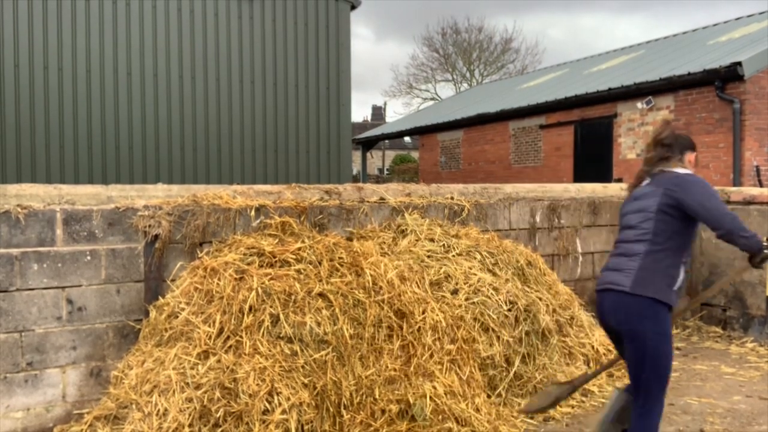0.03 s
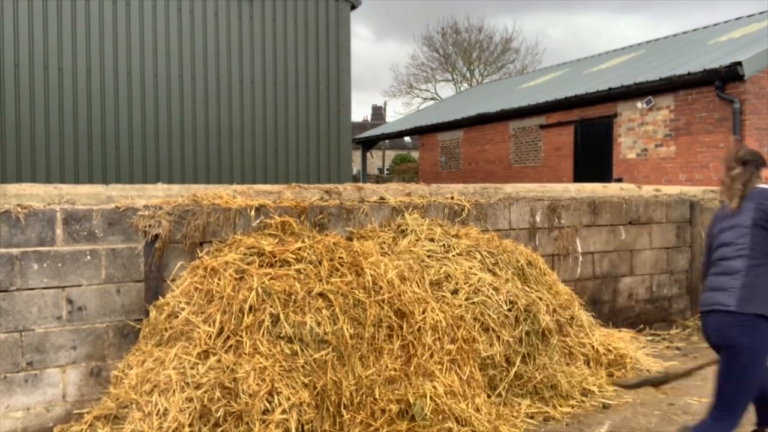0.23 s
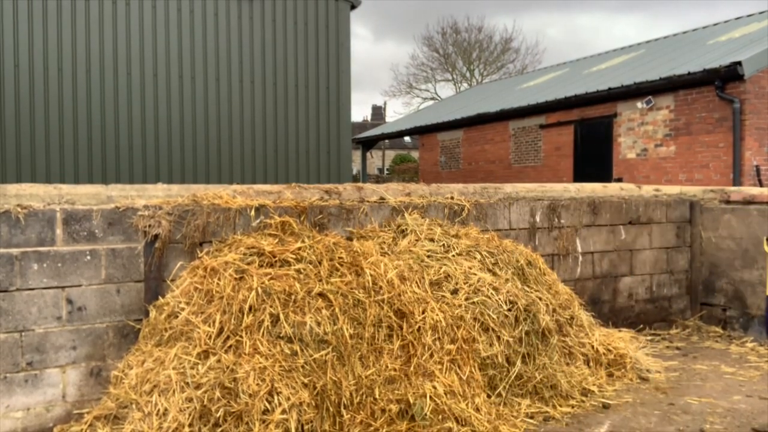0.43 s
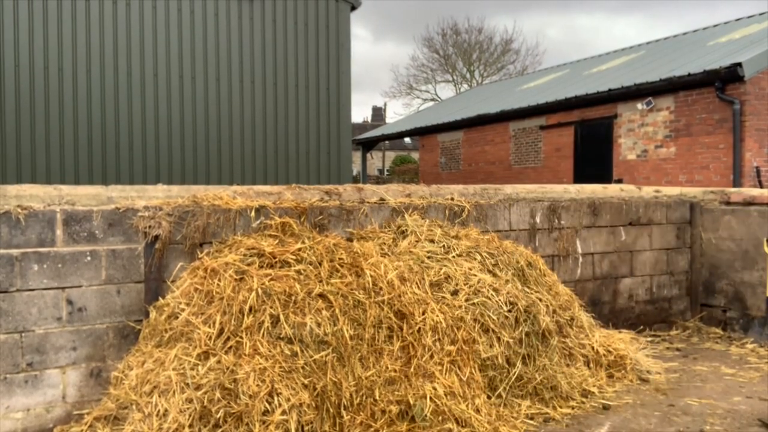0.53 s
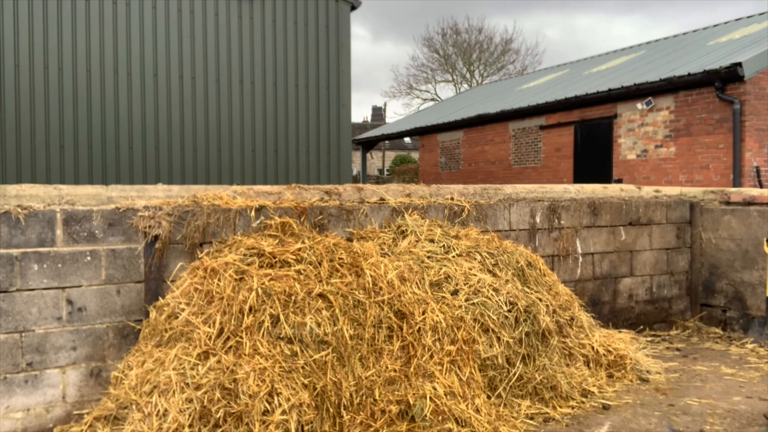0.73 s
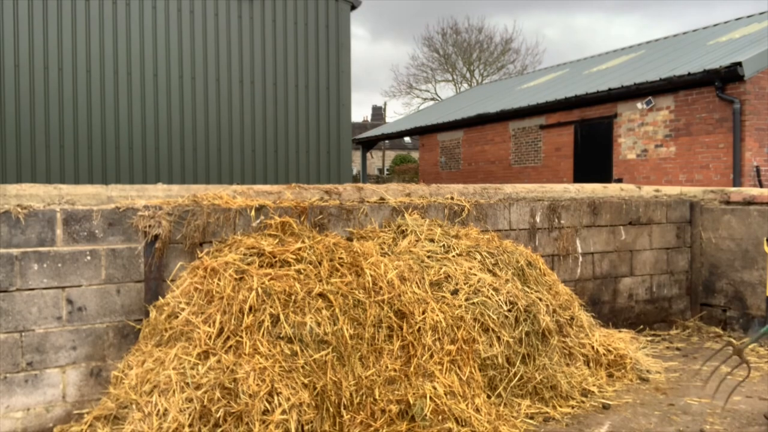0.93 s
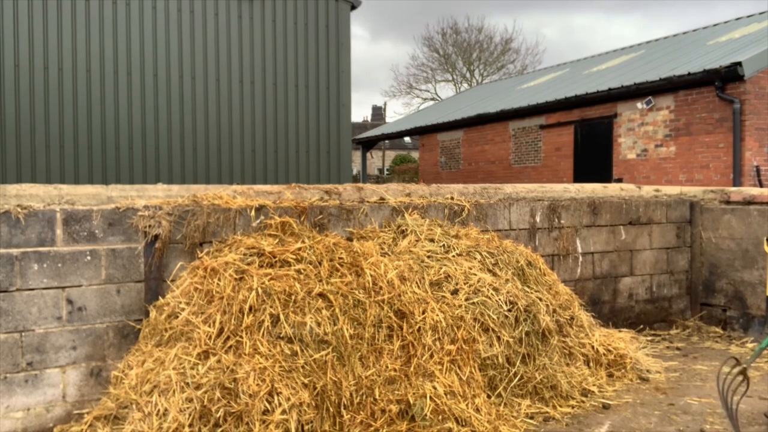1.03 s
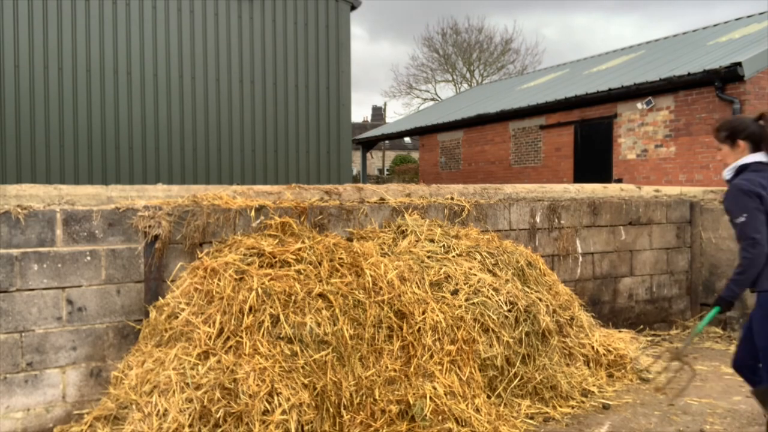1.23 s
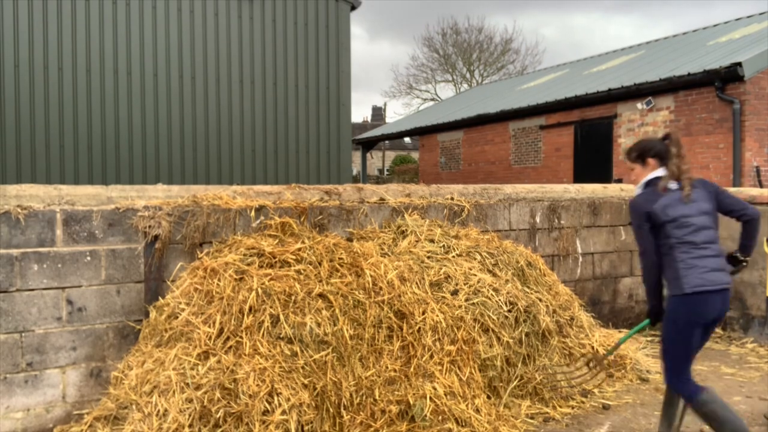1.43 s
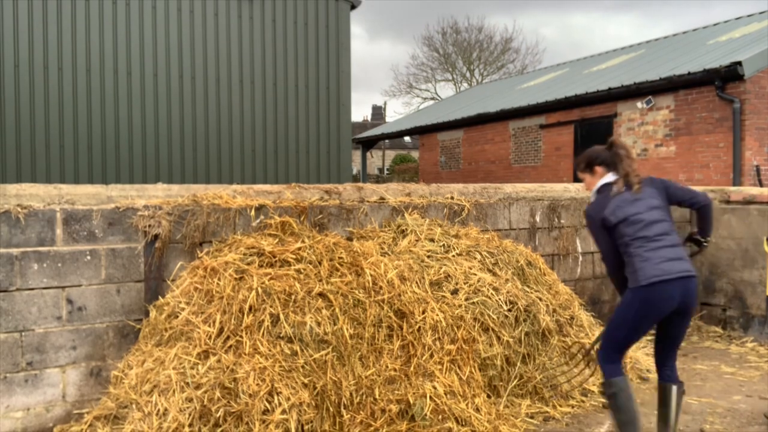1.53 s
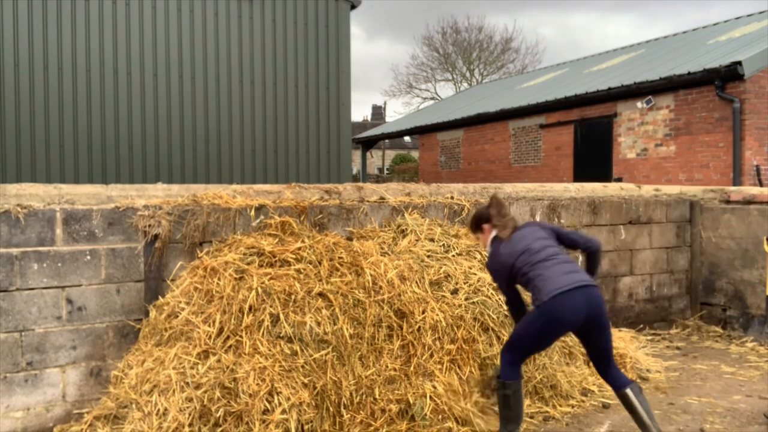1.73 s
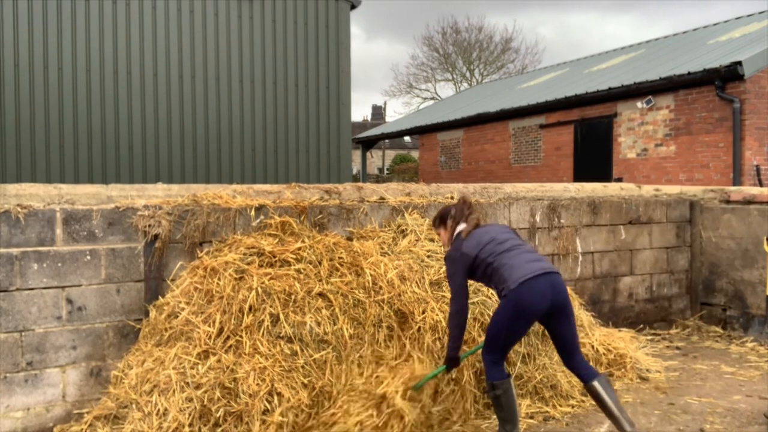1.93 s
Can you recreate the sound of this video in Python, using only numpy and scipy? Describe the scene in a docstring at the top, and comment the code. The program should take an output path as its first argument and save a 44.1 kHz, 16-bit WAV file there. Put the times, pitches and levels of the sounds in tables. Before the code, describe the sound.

A long-handled tool clatters and knocks on concrete, then a fork crunches into straw.

```python
"""A walled farmyard in a light wind. Boots scuff and loose straw rustles; off to the right the head of a
long-handled tool cracks and rings on concrete, then its shaft knocks twice. Gusts rumble and buffet the
microphone, hardest near the middle, while a small bird whistles far away. Last, a fork brushes the straw
and is driven into the heap, snapping and crushing stalks. The walls return a faint echo of the work."""
import sys
import numpy as np
from scipy import signal
from scipy.fft import rfft, irfft
from scipy.io import wavfile

SR = 44100
rng = np.random.default_rng(int(sys.argv[2]) if len(sys.argv) > 2 else 0)


def pcm_store(signal):
    """Save signal as 16-bit PCM."""
    levels = np.round(np.clip(np.atleast_2d(signal), -1, 1) * 32767)
    wavfile.write(sys.argv[1], SR, levels.astype(np.int16).T)


N = 88200
T = np.arange(N) / SR


def knocks(hits, modes, crack_spectrum, snap_gain, snap_treble_db):
    """Each contact rings the modes by where it lands and adds a crack: bright snap, gritty decay."""
    out = np.zeros((2, N))
    for start, ring_db, crack_db, cutoff_hz, point, t60_share in hits:
        age = np.maximum(T - start, 0)
        ring = np.zeros(N)
        for k, (hz, *levels_db, t60) in enumerate(modes):
            gain = (-1) ** k * from_db(np.interp(point, [0, 1], levels_db))
            ring += gain * decay(start, t60_share * t60) * np.sin(2 * np.pi * hz * age)
        ring *= 1 - np.exp(-age / 0.0005)  # soft onset
        grit = scattered(rng.standard_normal((3, N))) * unit_energy(decay(start, t60_s=0.066))
        snap = rng.standard_normal(N) * unit_energy(decay(start, t60_s=0.011))
        snap = from_right(colour(snap, [(3000, 0.0047), (13000, snap_treble_db)]))
        crack = colour((grit + snap_gain * snap) / np.hypot(1, snap_gain), crack_spectrum)
        out += low_pass(from_db(ring_db) * from_right(ring) + from_db(crack_db) * crack, cutoff_hz)
    return out


# head contacts: (time [s], ring gain [dB], crack gain [dB], cut-off [Hz], point [0 edge, 1 flat],
# share of free t60 [ratio])
HEAD_HITS = [(.3888, -18, -7, 16080, 0, 0.92), (.3905, -5.5, -1, 16000, 0, 0.41),
             (.3928, -2, -4.5, 2500, 0.19, 0.46), (.4015, -23, -11, 12040, 0, 0.52),
             (.4475, -25.5, -25.5, 2967, 1, 1), (.4632, -29, -17, 6360, 1, 0.82),
             (.4688, -10.5, -16.5, 1460, 0.68, 1), (.4975, -20, -19.5, 1520, 1, 0.47),
             (.5215, -24, -25.5, 1800, 0.96, 1), (.571, -28.5, -31.5, 1096, 0.69, 1)]
# head modes: (frequency [Hz], edge-struck level [dB], flat-struck level [dB], free t60 [s])
HEAD_MODES = [(297, -31.5, -16.5, 0.1), (407, -25.5, -19.5, .13), (583, -28, -27.5, 0.11),
              (770, -13.5, -22.5, .06), (940, -36.5, -24, 0.071), (1135, -14.5, -26, 0.14),
              (1333, -10, -24.5, .11), (1450, -24.5, -31.5, .09), (1733, -11, -35.5, 0.08),
              (2070, -30, -33, 0.094), (2970, -18, -43, .045), (3600, -29.5, -40.5, .07)]
# head crack spectrum: (frequency [Hz], gain [dB])
HEAD_CRACK = [(150, -2.5), (450, 13.5), (780, 22), (1400, 20), (2500, 13), (3450, 13.5), (4050, -5.5),
              (4800, 6), (6500, 2), (11000, -3.5), (15500, -2.5)]

def tool_head():
    """The head clatters on concrete, ringing more briefly when pressed down."""
    return knocks(HEAD_HITS, HEAD_MODES, HEAD_CRACK, snap_gain=0.29, snap_treble_db=5.5)


# shaft contacts: (time [s], ring gain [dB], crack gain [dB], cut-off [Hz], point [0 end, 1 side],
# share of free t60 [ratio])
SHAFT_HITS = [(.6392, -34.5, -21, 12000, 0, .6), (.6425, -3.5, 1.5, 19850, 0.13, 0.89),
              (.6485, -3, -8, 2530, 0, 1), (.6525, -14.5, -4, 10960, 0, 0.54),
              (.7612, -9, -7.5, 7810, 0.99, 1), (.7703, -11.5, -11.5, 8290, 1, 0.27)]
# shaft modes: (frequency [Hz], end-struck level [dB], side-struck level [dB], free t60 [s])
SHAFT_MODES = [(343, -36.5, -36.5, 0.12), (571, -19, -21.5, 0.097), (808, -27, -17.5, 0.098),
               (1164, -19.5, -45.5, 0.05), (1410, -21, -28.5, 0.13), (1520, -32.5, -14, 0.089),
               (1646, -22.5, -32.5, .041), (1900, -25.5, -25.5, .033), (2410, -21.5, -49.5, .09),
               (2729, -29.5, -41, .075), (2994, -39, -18, .04), (8040, -26.5, -20, .007),
               (12900, -26, -44.5, .012)]
# shaft crack spectrum: (frequency [Hz], gain [dB])
SHAFT_CRACK = [(150, -11), (500, 16.5), (1000, -5), (1400, 16.5), (2300, 12.5), (3600, 6.5), (4700, 9),
               (6500, -1), (7900, 11.5), (9500, -1.5), (12200, 5), (14200, 6), (15500, -0.5)]

def tool_shaft():
    """The shaft knocks on its end, then on its side, rebounding each time."""
    return knocks(SHAFT_HITS, SHAFT_MODES, SHAFT_CRACK, snap_gain=0.61, snap_treble_db=7)


# faint ticks, then tine stabs: (time [s], force [dB], hold [s], stalk pitch [Hz], crush re snaps [dB])
STABS = [(0.174, -59.5, 0.0023, 11600, -17), (0.24, -55.5, .003, 9200, -26), (0.291, -56, 0.0027, 7100, -7),
         (0.309, -59, 0.0052, 8100, -24), (1.533, -47, .004, 8200, -3.5), (1.538, -48, 0.0087, 11800, -4.5),
         (1.7196, -28.5, 0.0034, 3770, -13.5), (1.7321, -27, 0.0048, 12800, -13),
         (1.746, -45.5, 0.013, 3930, 3.5), (1.7615, -34, 0.0042, 10300, -2.5), (1.769, -42, 0.012, 1520, 0),
         (1.791, -28.5, .002, 7670, -8), (1.8015, -33, 0.003, 3380, -7)]
# breaking straw spectrum: (frequency [Hz], gain [dB])
SNAP_SPECTRUM = [(400, -27.5), (1300, -18), (2600, -8), (3350, 0.5), (4700, -3.5), (7000, 3), (10000, 4.5),
                 (15500, 0)]
# crushed straw spectrum: (frequency [Hz], gain [dB])
CRUSH_SPECTRUM = [(400, -19.5), (1100, -8.5), (1500, 1), (2000, -5.5), (2700, -6.5), (3400, -1),
                  (5000, -9.5), (15500, -26)]

def straw_crunch():
    """Each stab snaps dry stalks, rings one of them and crushes the packed straw beneath."""
    rise_s, t60_s = 0.0015, 0.062
    snaps = crackle(SNAP_SPECTRUM, per_s=8000, spread_db=2.5)
    snaps += from_db(-3) * crackle(SNAP_SPECTRUM, per_s=900, spread_db=3)  # single stalks
    snaps = unit_rms(snaps * from_db(3 * drift(220)))  # stalks give way in bunches
    crush = crackle(CRUSH_SPECTRUM, per_s=3000, spread_db=3)
    out = np.zeros((2, N))
    for start, force_db, hold_s, stalk_hz, crush_db in STABS:
        attack = np.clip((T - start) / rise_s, 0, 1)
        release = from_db(-60 * np.clip((T - start - hold_s) / t60_s, 0, 4))
        ring = unit_rms(signal.lfilter(*signal.iirpeak(stalk_hz, Q=7, fs=SR), snaps))
        crunch = (snaps + from_db(-7.5) * ring + from_db(crush_db) * crush) / 2
        out += from_db(force_db) * attack * release * crunch
    return out


# sliding envelope: (time [s], level [dB])
SLIDE_LEVEL = [(0, -81), (.05, -68.5), (.13, -83), (.22, -103.5), (.31, -89), (.38, -61), (.47, -56),
               (.55, -62.5), (.62, -77.5), (1.24, -82), (1.35, -59), (1.40, -62.5), (1.51, -76),
               (1.57, -69.5), (1.65, -83), (1.71, -63), (1.77, -44), (1.86, -51.5), (2, -58)]
# sliding stalk spectrum: (frequency [Hz], gain [dB])
SLIDE_SPECTRUM = [(500, -5.5), (1200, -7.5), (3000, -2.5), (5000, -3), (7500, 3.5), (11000, -2),
                  (15500, -0.5)]

def straw_slide():
    """Loose stalks hiss and tick as they slide."""
    hiss = crackle(SLIDE_SPECTRUM, per_s=12000, spread_db=4.5)
    ticks = crackle(SLIDE_SPECTRUM, per_s=230, spread_db=4.5)
    return from_db(curve(T, SLIDE_LEVEL)) * (hiss + from_db(-4) * ticks)


# boot scuffs: (time [s], level [dB], t60 [s])
SCUFFS = [(.005, -70, 0.99), (0.037, -59.5, 0.099), (0.29, -62, 0.057), (1.648, -57, 0.043),
          (1.679, -58.5, 0.048), (1.70, -58.5, 0.19)]
# rasp spectrum: (frequency [Hz], gain [dB])
SCUFF_SPECTRUM = [(500, -11.5), (1500, -3), (2900, 2.5), (5000, -13), (9000, -16.5), (15500, -24)]

def boots():
    """Boots rasp on dry litter."""
    envelope = sum(from_db(db) * decay(start, t60) for start, db, t60 in SCUFFS)
    return envelope * crackle(SCUFF_SPECTRUM, per_s=1800, spread_db=3)


# eddies: (time [s], strength [dB], pitch [Hz])
BUFFETS = [(0.114, -25, 138), (0.221, -23.5, 290), (0.251, -27, 270), (0.277, -23.5, 456),
           (.305, -22.5, 336), (0.323, -25, 313), (0.356, -26.5, 343), (0.58, -17.5, 158),
           (0.592, -25.5, 261), (0.72, -31, 215), (0.797, -26.5, 200), (0.829, -18, 113), (0.937, -19, 337),
           (0.9477, -8, 297), (0.965, -14.5, 175.7), (.982, -22.5, 279), (1.034, -24, 330.6),
           (1.049, -19, 183), (1.064, -27, 232), (1.104, -22, 250), (1.301, -34, 332),
           (1.316, -33.5, 260.5), (1.429, -33.5, 264), (1.477, -34, 239), (1.559, -34, 173),
           (1.572, -25, 172), (1.644, -44, 327), (1.842, -32, 168), (1.99, -26.5, 145)]

def buffets():
    """An eddy hits the microphone: a damped thump and a turbulent puff, brighter the harder it hits."""
    t60_cycles, puff_s, puff_hz = 5.34, 0.0019, 700
    octaves_per_db, reference_db = 0.11, -23.5
    out = np.zeros(N)
    for start, db, hz in BUFFETS:
        thump = decay(start, t60_cycles / hz) * np.sin(2 * np.pi * hz * (T - start))
        thump = low_pass(thump, 2.15 * hz, order=3)
        puff = rng.standard_normal(N) * np.exp(-np.abs(T - start) / puff_s)
        puff = low_pass(puff, puff_hz) * np.sqrt(SR / 2 / puff_hz)  # power made up
        reach_hz = 2.52 * hz * 2 ** (octaves_per_db * (db - reference_db))
        out += from_db(db) * (thump + from_db(-12) * low_pass(puff, reach_hz, order=5))
    return high_pass(out, hz=74, order=3)


# gust envelope: (time [s], level [dB])
GUSTS = [(0, -44.5), (.17, -43.5), (.27, -32), (.36, -36.5), (.45, -40.5), (.55, -41), (.6, -30),
         (.68, -41.5), (.76, -43.5), (.84, -37), (.89, -36.5), (.97, -34.5), (1.09, -36.5), (1.17, -43),
         (1.24, -49.5), (1.33, -43), (1.41, -46.5), (1.52, -47.5), (1.56, -44), (1.63, -47.5), (2, -44)]
# rumble spectrum: (frequency [Hz], gain [dB])
RUMBLE_SPECTRUM = [(20, -32.5), (40, -40), (65, -10.5), (100, 1), (140, 1), (210, -4.5), (330, -19),
                   (500, -28.5), (1000, -39.5), (2000, -90.5)]
# flutter spectrum: (frequency [Hz], gain [dB])
FLUTTER_SPECTRUM = [(100, -15), (220, 3.5), (350, 4.5), (550, -4), (850, -20), (1300, -35.5), (3000, -46)]

def wind():
    """Lumpy rumble at the microphone, alike on both sides; flutter grows faster than the gust."""
    flutter_growth, reference_db = 1.93, -32.5
    gust_db = curve(T, GUSTS)
    rumble = from_db(gust_db + 1.5 * drift(15)) * noise(RUMBLE_SPECTRUM)
    flutter_db = -47 + flutter_growth * (gust_db - reference_db) + 4.5 * drift(71)
    return rumble + from_db(flutter_db) * noise(FLUTTER_SPECTRUM)


# whistles: (time [s], length [s], start pitch [Hz], middle pitch [Hz], end pitch [Hz], level [dB])
WHISTLES = [(-.02, 0.12, 5900, 5530, 5500, -73), (0.92, 0.031, 6900, 6570, 5640, -66.5),
            (1.025, 0.07, 5690, 4970, 5120, -72.5), (1.245, .09, 6370, 5350, 4810, -77),
            (1.567, 0.087, 6200, 6860, 6600, -77)]

def bird():
    """Thin, warbling whistles, each curving through three pitches."""
    warble_hz, tremor_db = 80, 3
    out = np.zeros(N)
    for start, length_s, *pitches_hz, db in WHISTLES:
        progress = np.clip((T - start) / length_s, 0, 1)
        glide_hz = np.polyval(np.polyfit([0, .5, 1], pitches_hz, 2), progress)
        hz = glide_hz + warble_hz * drift(410)
        envelope = from_db(db + tremor_db * drift(80)) * np.sqrt(np.abs(np.sin(np.pi * progress)))
        out += envelope * np.sin(2 * np.pi * np.cumsum(hz) / SR)
    return out


# distant air spectrum: (frequency [Hz], gain [dB])
AIR_SPECTRUM = [(100, -18), (500, 3.5), (1000, -1), (2500, -9), (5000, -25), (7500, -20.5), (11000, -36.5),
                (15500, -33)]

def air():
    """A steady distant hush, independent on each side."""
    return from_db(-68) * noise(AIR_SPECTRUM, shape=(2, N))


# ground and near-wall reflections: (delay [s], gain [dB])
BOUNCES = [(.0024, -13.5), (.0052, -11.5), (.011, -18)]

def bounced(x):
    """First reflections add to the sound and comb it."""
    return x + sum(from_db(db) * np.pad(x, ((0, 0), (int(s * SR), 0)))[:, :N] for s, db in BOUNCES)


# echo spectrum: (frequency [Hz], gain [dB])
ECHO_SPECTRUM = [(200, -27.5), (700, -24.5), (1400, -25.5), (4000, -24.5), (8000, -27.5), (15000, -34)]

def yard_echo(x):
    """A faint diffuse echo from walls and sheds; its top dies slightly sooner."""
    delay_s, split_hz = 0.016, 12000
    white = rng.standard_normal((2, N))
    dull = low_pass(white, split_hz) * decay(delay_s, t60_s=0.36)
    bright = high_pass(white, split_hz) * decay(delay_s, t60_s=0.35)
    echo = signal.fftconvolve(x, unit_energy(dull - bright), axes=1)[:, :N]
    return colour(echo, ECHO_SPECTRUM)


# left minus right: (frequency [Hz], level [dB])
SHADOW = [(100, 0), (800, 0), (1200, -5), (2700, -5.3), (3800, -.5), (15000, -.7)]

def shadowed(x):
    """Sound from the right is weaker on the left, mostly at 1-3 kHz."""
    left = colour(x[0], [(hz, db / 2) for hz, db in SHADOW])
    right = colour(x[1], [(hz, -db / 2) for hz, db in SHADOW])
    return np.array([left, right])


# left-side delay: (frequency [Hz], lag [s])
LEFT_LAG = [(700, .00004), (1200, .000125), (4000, .000115), (7800, .00013), (12500, .000098),
            (15000, .000072)]

def from_right(x, lag_share=1):
    """Sound reaches the left side later, least so in the bass."""
    hz = np.arange(N // 2 + 1) * SR / N
    lag_s = lag_share * curve(hz, LEFT_LAG)
    return np.array([irfft(rfft(x) * np.exp(-2j * np.pi * hz * lag_s), N), x])


def scattered(noises, lag_share=1, diffuse_share=0.48):
    """Three noises form a direct part and a diffuse part that is wide only above the bass."""
    direct, mid, side = noises
    side = high_pass(side, hz=1400)
    diffuse = np.sqrt(diffuse_share / 2) * np.array([mid + side, mid - side])
    return np.sqrt(1 - diffuse_share) * from_right(direct, lag_share) + diffuse


def crackle(spectrum, per_s, spread_db):
    """A stream of tiny snaps of uneven size, nearer the centre than the tool."""
    sizes = from_db(spread_db * np.minimum(rng.exponential(1, (3, N)), 5))
    signs = rng.choice([-1, 1], (3, N))
    clicks = sizes * signs * (rng.random((3, N)) < per_s / SR)
    return unit_rms(colour(scattered(clicks, lag_share=0.69), spectrum))


def colour(x, points):
    """Minimum-phase filter through (frequency [Hz], gain [dB]) points."""
    size = 2 ** 17
    hz, db = np.transpose(points)
    bins_hz = np.arange(size // 2 + 1) * SR / size
    gain = from_db(np.interp(np.log(bins_hz + 1), np.log(hz), db))
    cepstrum = irfft(np.log(gain))
    cepstrum[1:size // 2] *= 2
    cepstrum[size // 2 + 1:] = 0
    return irfft(rfft(x, size) * np.exp(rfft(cepstrum)))[..., :N]


def noise(spectrum, shape=N):
    """Coloured noise, unit RMS."""
    return unit_rms(colour(rng.standard_normal(shape), spectrum))


def drift(hz):
    """Random wander below hz, unit RMS."""
    return unit_rms(low_pass(rng.standard_normal(2 * N), hz)[N:])


def decay(start_s, t60_s):
    """Exponential decay from start_s."""
    return (T >= start_s) * from_db(-60 * np.clip(T - start_s, 0, 4 * t60_s) / t60_s)


def low_pass(x, hz, order=2):
    return signal.sosfilt(signal.butter(order, hz, fs=SR, output="sos"), x + 1e-18)


def high_pass(x, hz, order=2):
    return signal.sosfilt(signal.butter(order, hz, "high", fs=SR, output="sos"), x)


def curve(x, points):
    return np.interp(x, *np.transpose(points))


def from_db(db):
    return 10 ** (np.asarray(db) / 20)


def unit_rms(x):
    return x / np.sqrt(np.mean(x ** 2) + 1e-20)


def unit_energy(x):
    return x / np.sqrt(np.sum(x ** 2, axis=-1, keepdims=True) + 1e-20)


def scene():
    """Tool, straw and boots to the right in the yard, with wind, bird and distant air."""
    work = tool_head() + tool_shaft() + bounced(straw_crunch() + straw_slide()) + boots()
    return shadowed(work + yard_echo(work)) + air() + wind() + buffets() + bird()


def record(dry):
    """Steep low-pass at 16.1 kHz."""
    return signal.sosfilt(signal.ellip(10, .1, 80, 16100, fs=SR, output="sos"), dry)


dry = scene()
out = record(dry)
pcm_store(out)
```